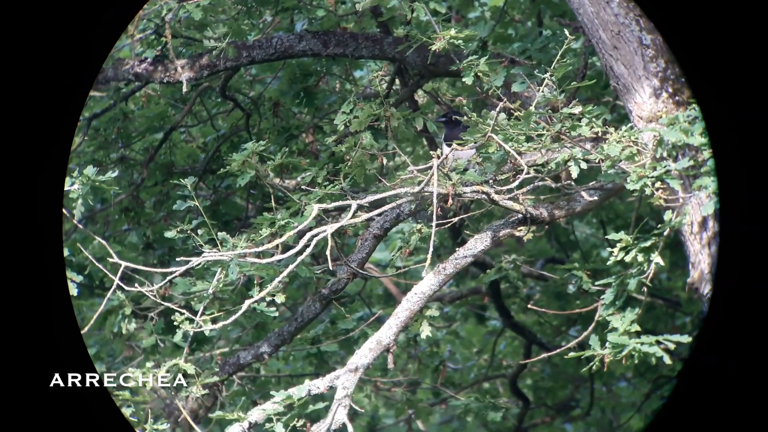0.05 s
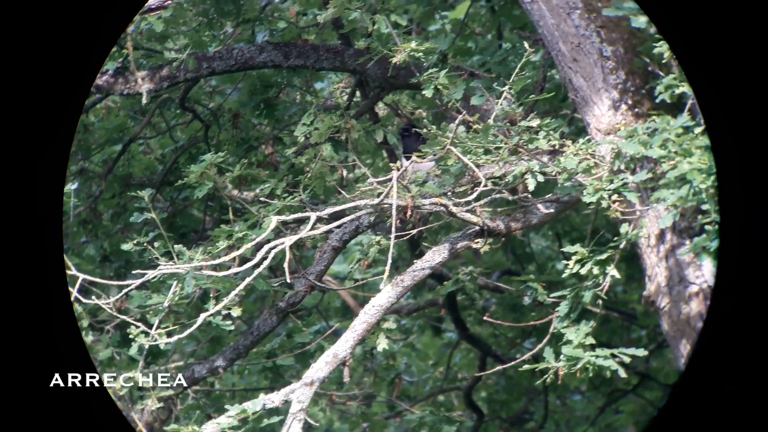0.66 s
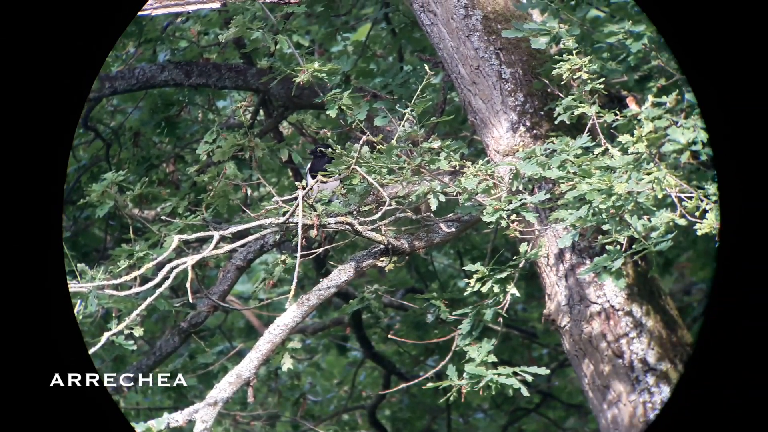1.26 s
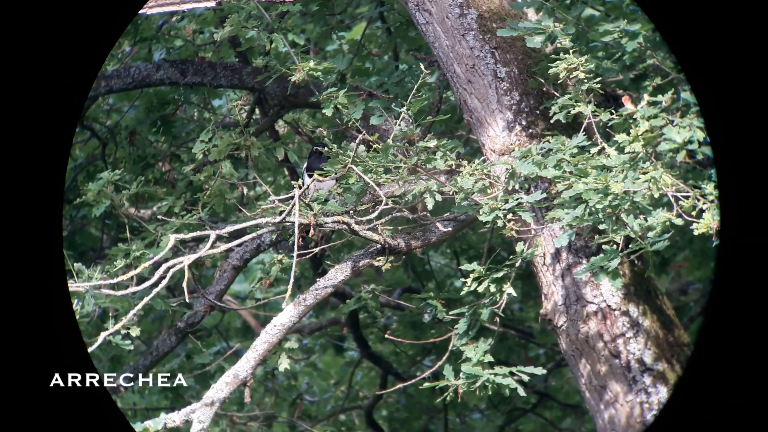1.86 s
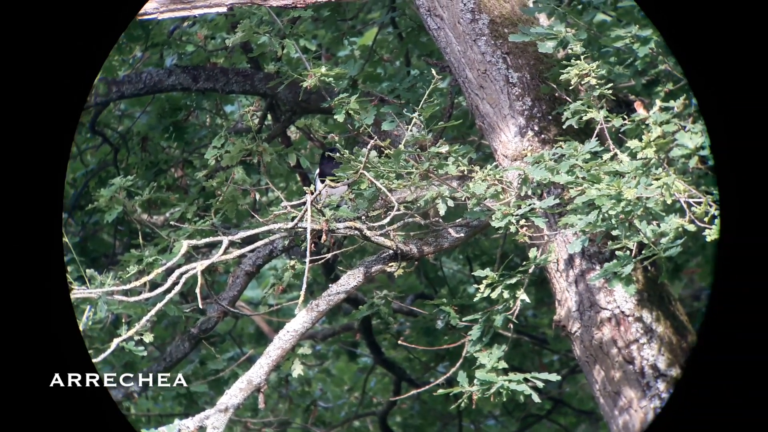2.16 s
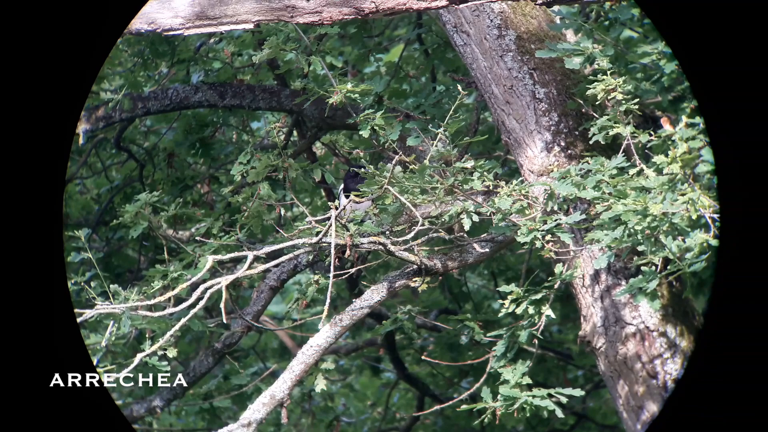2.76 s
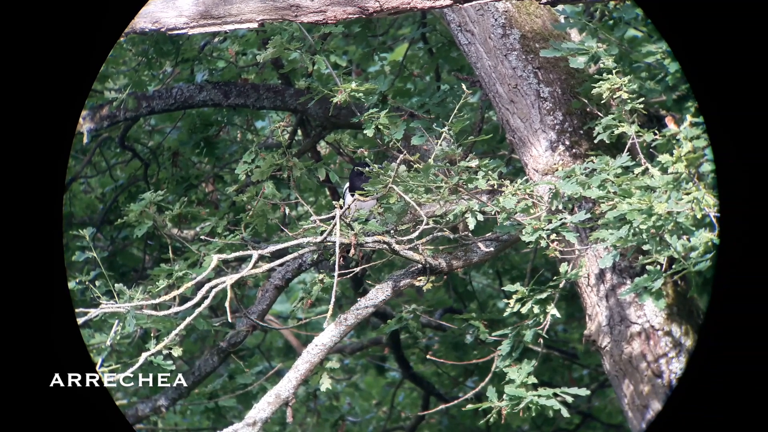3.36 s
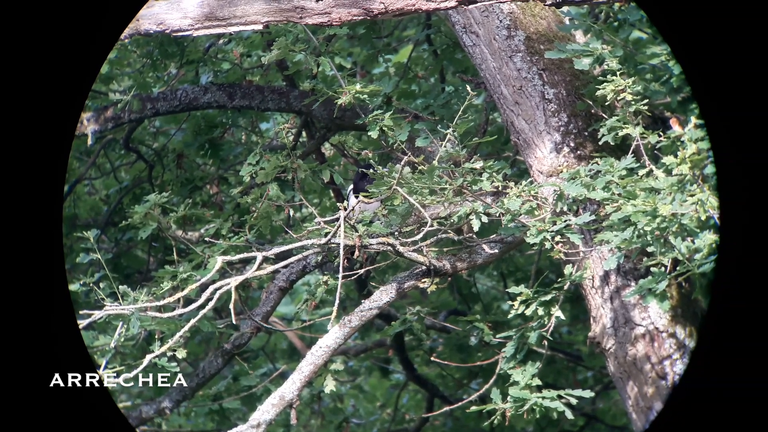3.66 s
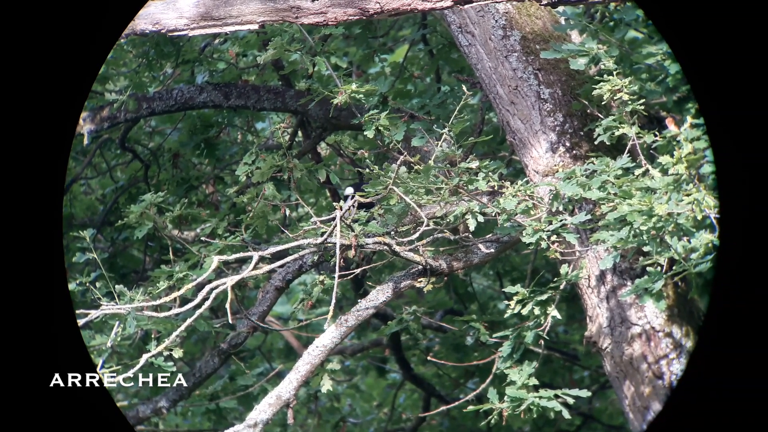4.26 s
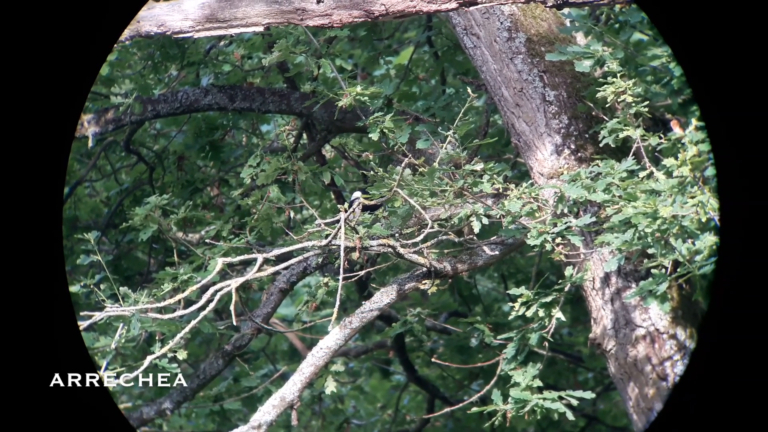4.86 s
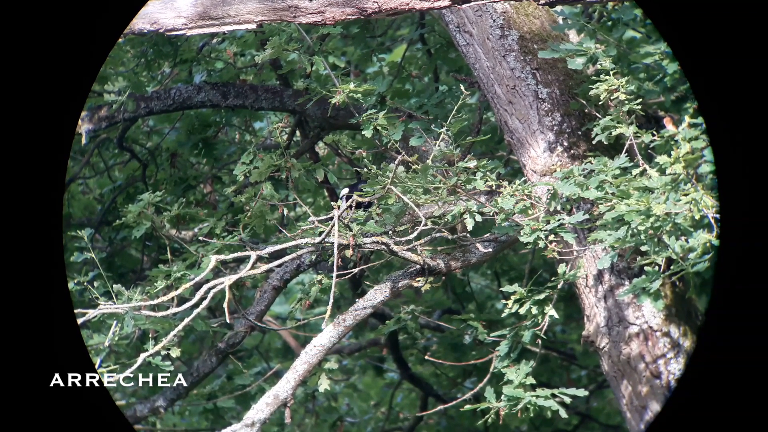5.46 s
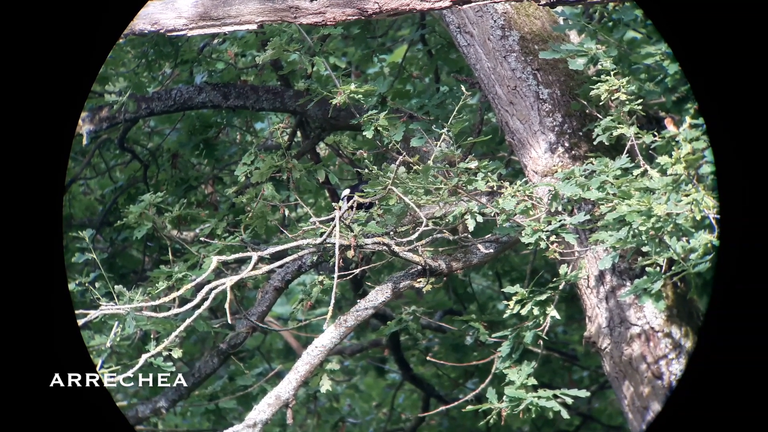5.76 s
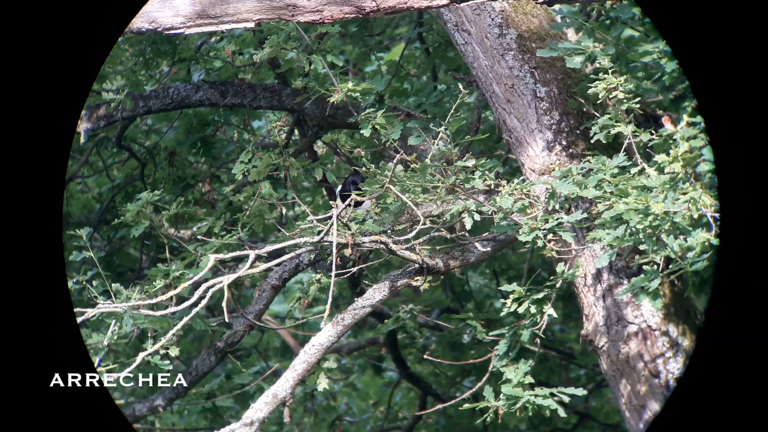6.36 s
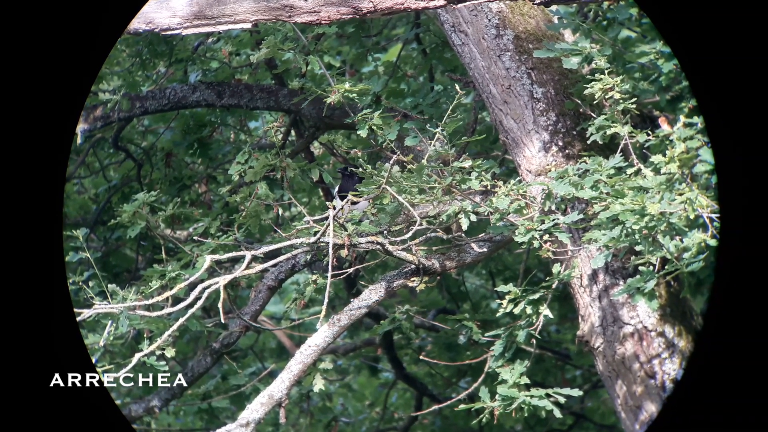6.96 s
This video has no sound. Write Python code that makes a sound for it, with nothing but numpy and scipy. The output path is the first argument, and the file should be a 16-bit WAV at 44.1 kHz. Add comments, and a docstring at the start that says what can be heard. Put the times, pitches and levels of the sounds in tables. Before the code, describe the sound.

Birds yelp, whistle and rasp at irregular intervals among trees, their calls trailing off softly above a faint far-off road rumble.

```python
"""Jackdaws in a summer oak wood

Jackdaws trade yelps that scoop up to a crest and sweep down, thin whistles, dry chaks and a few harsh
screeches. Yelps and whistles are wavering tones coloured by throat and beak; chaks are puffs of noise,
screeches a ragged mix of both. Trunks and leaves scatter each call into a long soft tail. The flock
calls far off, a small songbird pipes high up, twigs tick, leaves hiss and far traffic rumbles below."""
import sys
import numpy as np
from scipy import signal
from scipy.fft import rfft, irfft, next_fast_len
from scipy.io import wavfile
from scipy.ndimage import uniform_filter1d

SR = 44100
rng = np.random.default_rng(int(sys.argv[2]) if len(sys.argv) > 2 else 0)


def generate_wav(sig):
    """Save sig (samples, or channels by samples) to the path in sys.argv[1] as 16-bit PCM at SR."""
    pcm = np.round(np.clip(np.atleast_2d(sig).T, -1, 1) * 32767).astype(np.int16)
    wavfile.write(sys.argv[1], SR, pcm)


N = 313992

# Stereo width of the noises. Each row: frequency in Hz, left-right correlation.
EAR_LIKENESS = [(30, 0.86), (70, 0.97), (150, 0.96), (300, 0.75), (600, 0.28), (1200, 0), (16000, 0)]
# Their lean to one side. Each row: frequency in Hz, right minus left in dB.
EAR_BALANCE = [(40, -3.5), (110, 4), (200, 0.5), (380, 0.5), (700, 1.5), (1400, 0.5), (3000, 0),
               (14000, -0.7)]

# Colours of the noises. Each row: frequency in Hz, relative level in dB.
TRAFFIC_COLOUR = [(20, -33), (35, -24), (55, -5.5), (90, 2.5), (125, -4.5), (200, -8), (280, -10.5),
                  (420, -16), (650, -17), (1000, -24), (1600, -27.5), (3000, -46)]
VEHICLE_COLOUR = [(60, -47), (110, 5.5), (170, 1.5), (260, 9), (340, 1), (450, -9.5), (800, -62)]
HISS_COLOUR = [(500, 2.5), (1200, -4), (2000, 4), (3500, 1.5), (4500, -5), (6000, -13), (9500, -18),
               (12000, -10.5), (15500, -9.5)]
TWIG_COLOUR = [(200, -27), (400, -16), (1300, 14), (2200, -18), (8000, -16), (13000, -6), (16000, -22)]
BRUSH_COLOUR = [(6000, -30), (9500, -6), (12300, 6), (14000, -8), (16000, -23)]
CHAK_COLOUR = [(600, -29), (900, -38), (1150, 5), (1450, -5.5), (2100, -1), (2700, 1.5), (3800, -12.5),
               (5500, -20), (9000, -39)]
RASP_COLOUR = [(1200, -30), (1900, -5.5), (2700, -12), (3300, 4), (4100, 1.5), (5300, -9), (6000, -19),
               (8000, -20), (11000, -40)]

# Ebb and flow of the far traffic. Each row: time in seconds, relative level in dB before compression.
TRAFFIC_SURGE = [(0.0, -58.5), (1.29, -59.5), (2.14, -55), (2.38, -57), (2.7, -56), (3.03, -57),
                 (6.48, -55), (7.12, -58)]
# Partials of a far engine drone. Each row: frequency in Hz, level in dB.
ENGINE_PARTIALS = [(94, -69.5), (183, -69.5), (275, -70), (366, -71.5)]
# Fader rides for the passing vehicle and the leaf hiss. Each row: time in seconds, level in dB.
VEHICLE_LEVEL = [(0, -61.5), (4.4, -66), (5.4, -62), (5.9, -52.5), (6.25, -49), (6.6, -55.5), (7.12, -53.5)]
HISS_LEVEL = [(0, -62.5), (.8, -67.5), (1.5, -62), (3, -62.5), (4.5, -62.5), (5.8, -62.5), (6.15, -64.5),
              (7.12, -64.5)]
# Twig snaps. Each row: start in seconds, level in dB, pitch ratio, treble lift in dB, decay in seconds,
# leaf brush level in dB.
TWIG_SNAPS = [(2.271, -49, 1.05, -13, 0.0026, -85), (3.812, -48, 1, 4, 0.0025, -61)]
# The wood's reverb. Each row: frequency in Hz, echo gain in dB, seconds to die away by 60 dB.
WOOD_REVERB = [(700, -14, .8), (1450, 0.5, 0.98), (2420, 2.5, 1.6), (3640, 4.5, 0.7), (5100, 3, 1.6),
               (7800, 5.5, 1.17), (12100, 7, 0.58)]

# Resonance of throat and beak. Each row: frequency in Hz, relative gain in dB.
THROAT_RESONANCE = [(1000, -5), (1600, -8.5), (2300, 4), (3200, -3), (4200, -1), (5400, -8.5),
                    (6100, -18.5), (8000, -18.5), (12000, -42)]
# The voice is purer at the top of its range. Each row: pitch in Hz, overtone lift in dB.
OVERTONES_BY_PITCH = [(1200, 1), (1600, 1.5), (1900, 4.5), (2250, 4.5), (2700, -6.5)]
# Cues for the hoarse calls. Each row: start in seconds, length in seconds, relative level in dB.
CHAK_CUES = [(0.956, 0.056, -59), (1.193, 0.067, -55.5), (1.361, 0.055, -61.5), (1.463, 0.033, -59),
             (1.566, 0.03, -55.5), (2.256, 0.023, -62), (2.314, 0.036, -59), (4.527, 0.085, -51),
             (6.262, 0.095, -66.5), (6.79, 0.063, -58.5)]
SCREECH_CUES = [(4.609, 0.17, -56.5), (4.862, .18, -54.5), (5.159, 0.15, -51.5), (5.478, 0.19, -52.5),
                (5.762, 0.19, -64.5)]
# Course of a screech. Each row: share of its length, pitch in Hz, tone gain in dB, rasp gain in dB.
SCREECH_COURSE = [(0, 1896, -14, -20), (.2, 2500, -4.5, -9.5), (.35, 2747, -7, -4.5), (.55, 2706, -12, -3),
                  (.8, 2500, -10, -6.5), (1, 2180, -9, -12)]
# Whistles; the highest are the songbird's. Each row: start and length in seconds, opening and held pitch
# in Hz, settling time in seconds, level in dB, fade over the note in dB, bearing from -1 right to
# 1 left, echo send in dB, roughness from 0 to 1.
WHISTLE_CUES = [ (0.034, 0.0605, 3023, 2783, 0.051, -52, 5.5, -0.094, -0.5, 0.75),
                (0.271, 0.28, 8280, 7370, 0.07, -75, 14, 0.23, -0.5, 0.43),
                (0.504, 0.17, 5900, 5020, .011, -68, 9, 0.13, -5, 0.4),
                (.62, 0.16, 2670, 2515, 0.072, -71, 9, -0.015, -6, 0.61),
                (0.708, 0.12, 5900, 5010, 0.014, -64.5, 3, .18, -8, 0.42),
                (0.906, .155, 7100, 6576, 0.013, -65.5, 8, -0.12, -6, 0.08),
                (1.033, .035, 2770, 2490, 0.019, -50, 12, .37, -13, .26),
                (1.318, .18, 6060, 5360, 0.0067, -68, 4, 0.21, -6, 0.38),
                (3.693, 0.11, 3700, 3140, 0.021, -50.5, -4.5, .03, -6.5, 0.25),
                (4.047, 0.029, 3600, 3120, 0.02, -48.5, 4, -0.2, -5, 0),
                (4.58, 0.13, 4130, 4050, 0.017, -55.5, 4.5, -0.077, -0.5, 0.66),
                (4.619, .065, 2810, 2370, 0.039, -46.5, 17, 0.47, -3, 0.33),
                (4.63, 0.16, 5600, 4920, .03, -62, 3, 0.15, -3, 0.9),
                (5.505, .05, 2400, 2745, 0.031, -50.5, -3, -0.51, -14, 0.66),
                (5.738, .11, 4200, 4240, .03, -60, 13, .16, -7, 0.77),
                (6.206, 0.14, 2112, 1956, 0.081, -74.5, 1, 0.34, 7.5, 1),
                (6.29, .05, 2830, 2696, 0.046, -69.5, 1.5, 0.29, 1, 1),
                (6.461, .065, 3160, 2954, 0.01, -62, 11, -.1, -20, .22),
                (6.652, 0.11, 3700, 3560, 0.031, -70, 7, .27, 4, 0.52),
                (6.768, 0.026, 3210, 2950, 0.015, -52, 13, -0.13, -1, 0.7),
                (7.089, 0.033, 3190, 2990, 0.025, -66.5, -2, 0, -7, 0.6)]
# Yelps. Each row: crest time, rise and fall in seconds, crest and end pitch in Hz, bend of the fall
# (1 is straight, more hangs on), crest and sweep level in dB, overtone lift in dB, roughness from 0 to 1,
# bearing from -1 right to 1 left, echo send in dB.
YELP_CUES = [ (.055, 0.05, 0.094, 2352, 1560, 1.65, -58.5, -49.5, 2.5, .45, 0.21, -0.5),
             (1.02, .045, .075, 2320, 1626, 1.4, -56, -50, 1.5, .4, 0.58, 1),
             (1.565, 0.0089, .109, 2764, 1650, 1.86, -58, -52.5, 7, 0.16, -0.91, -0.5),
             (1.715, 0.055, 0.074, 2138, 1374, 1.2, -48, -49, 4, .45, .26, -1.5),
             (1.85, 0, 0.13, 2703, 1503, 1.3, -63, -53.5, 0.5, 0.42, -0.7, 0),
             (2.085, 0.00096, 0.099, 2587, 1554, 2.65, -58.5, -52.5, 3.5, 0.35, 0.14, -2.5),
             (2.19, 0.00041, .105, 2607, 1540, 1.15, -62, -53, .5, 0.39, -0.73, 1),
             (2.39, 0.0031, 0.04, 1530, 1076, 2.5, -62, -55, -2, 0.23, -.7, -7),
             (2.516, .022, 0.012, 1693, 1620, 1, -45, -40, 3, 0.2, .09, -6),
             (2.543, 0.033, 0.087, 2300, 1308, 1.18, -44, -44, 4, 0.3, 0.098, -8),
             (2.7, 0.038, 0.078, 1862, 1100, 1.84, -56, -62, -0.5, 0.29, -0.56, -6.5),
             (2.915, 0.075, 0.084, 2723, 1435, 2, -60, -47, 4.5, 0.44, 0.067, -5.5),
             (3.178, 0, .088, 2504, 1810, 1.9, -62.5, -51, 5, 0.33, 0.12, -8),
             (3.285, 0.041, 0.09, 2022, 1404, 0.6, -47.5, -47.5, 2.5, 0.49, -0.15, -5.5),
             (3.69, 0.033, 0.0033, 2200, 2200, 1, -62, -70, 0, .4, -0.15, -18),
             (3.8, 0.0027, 0.093, 2639, 1460, 2.23, -53.5, -47.5, 4, 0.36, 0.099, -6),
             (4.067, 0.001, 0.11, 2690, 1373, 2.8, -58, -48, 2, 0.45, 0.053, -4.5),
             (4.259, 0.042, 0.013, 1614, 1630, 1.1, -69, -50, -7, 0.29, -0.39, -8),
             (4.277, .008, .09, 2118, 1456, 1, -56, -56.5, -1.5, 0.28, -0.32, 1.5),
             (4.72, 0.041, 0.07, 1855, 1220, 1.4, -58, -66, -4, 0.57, -0.32, -3),
             (4.96, 0, 0.08, 1854, 1245, 2.3, -55, -58.5, 1, 0.57, -0.86, -3),
             (5.155, 0.055, 0.015, 1946, 1930, 1, -63, -68, -7, 0.52, -0.6, 7),
             (5.25, 0.0054, 0.071, 1745, 1200, 2.17, -57, -54, 4, 0.57, -0.92, -1.5),
             (5.57, 0.004, 0.067, 1932, 1265, 2.1, -62, -63, -8, 0.42, -.87, 4),
             (6.57, 0.003, 0.034, 2190, 1790, 1.15, -71, -74, 4, 0.33, -.8, -12),
             (6.82, 0.0061, .055, 2110, 1770, 1, -67, -68, -5, .3, -0.54, 3)]
# A typical distant yelp: one such row without the crest time. Its negative rise means no scoop.
DISTANT_YELP = (-0.4, 0.03, 2203, 1500, 1.5, -80, -76.5, 0, 0.4, 0.3, 10)

CUTOFF_HZ = 15750
NOTE_EDGE_S = .009


def from_db(db):
    """Decibels to gain."""
    return 10 ** (np.asarray(db) / 20)


def unit_rms(x):
    """Scale to unit power."""
    return x / np.sqrt(np.mean(x ** 2) + 1e-20)


def fader(rows):
    """Gain at every sample from rows of seconds and dB."""
    return from_db(np.interp(np.arange(N) / SR, *np.transpose(rows)))


def at_hz(table, hz, column=1):
    """Read a column of a table on a log-frequency axis."""
    table = np.array(table)
    return np.interp(np.log(np.maximum(hz, 1)), np.log(table[:, 0]), table[:, column])


def drift(rate_hz, size):
    """Smooth random wander of spread 1."""
    pole = np.exp(-2 * np.pi * rate_hz / SR)
    run_in = int(SR / rate_hz)
    white = rng.standard_normal(size + run_in)
    return signal.lfilter([2 * (1 - pole) ** 1.5], [1, -2 * pole, pole * pole], white)[run_in:]


def noise(colour, size):
    """Coloured stereo noise of unit power, centred in the bass and wide above."""
    padded = next_fast_len(size)
    hz = np.fft.rfftfreq(padded, 1 / SR)
    mid, side = rfft(rng.standard_normal((2, padded)))
    alike, ears = np.clip(at_hz(EAR_LIKENESS, hz), -1, 1), np.array([[-1], [1]])
    pair = np.sqrt(1 + alike) * mid + ears * np.sqrt(1 - alike) * side
    gain = from_db(at_hz(colour, hz) + ears * at_hz(EAR_BALANCE, hz) / 2)
    return unit_rms(irfft(pair * gain, padded)[:, :size])


def soft_gate(size, edge_s):
    """A gate with rounded ends."""
    steps = np.arange(size)
    return np.sin(np.pi / 2 * np.clip(np.minimum(steps, steps[::-1]) / (edge_s * SR), 0, 1))


def phase_of(hz):
    """Running phase of a moving pitch, in radians."""
    return 2 * np.pi * np.cumsum(hz) / SR


def add(track, start_s, sound):
    """Mix a sound into a track."""
    at = max(int(start_s * SR), 0)
    track[:, at:at + sound.shape[-1]] += sound[:, :max(N - at, 0)]


def far_traffic(rumble_db=-54.0, surge_depth=0.5, wander_hz=2.54):
    """A bed of road rumble with a wavering engine drone; one distant vehicle swells past."""
    surge = unit_rms(fader(TRAFFIC_SURGE) ** surge_depth)
    rumble = from_db(rumble_db) * surge * noise(TRAFFIC_COLOUR, N)
    drone = sum(from_db(db) * np.sqrt(2) * np.sin(phase_of(hz + wander_hz * drift(4.14, N)))
                for hz, db in ENGINE_PARTIALS)
    vehicle = fader(VEHICLE_LEVEL) * noise(VEHICLE_COLOUR, N)
    return rumble + drone + vehicle


def leaves():
    """A faint, airy hiss from the leaves."""
    return fader(HISS_LEVEL) * noise(HISS_COLOUR, N)


def twigs(brush_s=0.035, treble_hz=5000):
    """Twigs tick nearby, and a leaf brushes after each."""
    out, size = np.zeros((2, N)), int(brush_s * SR)
    for start, db, ratio, treble_db, decay_s, brush_db in TWIG_SNAPS:
        colour = [(hz * ratio, band_db + treble_db * (hz > treble_hz)) for hz, band_db in TWIG_COLOUR]
        tick = from_db(db) * noise(colour, size) * np.exp(-np.arange(size) / (decay_s * SR))
        brush = from_db(brush_db) * noise(BRUSH_COLOUR, size) * soft_gate(size, brush_s / 3)
        add(out, start, tick + brush)
    return out


def woodland_echo(send, tail_s=1.3, build_s=0.0097, early_db=-2.0, early_s=0.0087):
    """Near branches answer at once; far trunks leave a long tail that dies soonest at the very top."""
    t = np.arange(int(tail_s * SR)) / SR
    edges_hz = np.geomspace(500, 15000, 11)
    onset = (1 - np.exp(-t / build_s)) * (1 + from_db(early_db) * np.exp(-t / early_s))
    white = rng.standard_normal((2, 2, len(t)))
    response = np.zeros((2, len(t)))
    for k, (low, high) in enumerate(zip(edges_hz, edges_hz[1:])):
        hz = np.sqrt(low * high)
        envelope = onset * from_db(-60 * t / at_hz(WOOD_REVERB, hz, column=2))
        envelope /= np.sqrt(np.sum(envelope ** 2))
        band = signal.sosfilt(signal.butter(2, [low, high], "band", fs=SR, output="sos"), white[k % 2])
        response += band * envelope * from_db(at_hz(WOOD_REVERB, hz))
    return signal.fftconvolve(send, response, axes=1)[:, :N]


def branch_scatter(calls, scatter_db=-5.0, longest_s=.02, count=14):
    """Twigs along the path add short detours, other ones for each ear, so a gliding tone ripples."""
    out = calls.copy()
    gain = from_db(scatter_db) / np.sqrt(count)
    for ear in range(2):
        for delay_s, sign in zip(rng.uniform(.001, longest_s, count), rng.choice([-1, 1], count)):
            lag = int(delay_s * SR)
            out[ear, lag:] += sign * gain * calls[ear, :-lag]
    return out


def far_flock(count=16, pitch_spread=.15, level_spread_db=10):
    """Yelp cues for distant birds, each at its own moment, pitch and strength."""
    rise, fall, crest_hz, end_hz, bend, crest_db, sweep_db, *voice = DISTANT_YELP
    cues = []
    for k, (when, pitch, strength) in enumerate(rng.uniform(-1, 1, (count, 3))):
        ratio, db = 1 + pitch_spread * pitch, level_spread_db * strength
        crest_s = (k + .5 + when / 2) * N / SR / count
        cues.append((crest_s, rise, fall, crest_hz * ratio, end_hz * ratio, bend,
                     crest_db + db, sweep_db + db, *voice))
    return cues


def chaks(grain_db=0.5):
    """Short, hoarse, toneless calls: puffs of noise that swell and fade."""
    out = np.zeros((2, N))
    for start, length, db in CHAK_CUES:
        size = int(length * SR)
        swell = np.sin(np.linspace(0, np.pi, size))
        grain = from_db(-grain_db * np.tanh(drift(220, size)))
        add(out, start, from_db(db) * swell * grain * noise(CHAK_COLOUR, size))
    return out


def screeches(jitter=0.0485, grain_db=2.0, trill_hz=55, trill_depth=0.32):
    """The syrinx runs chaotic: a ragged, trilling tone rises and breaks up into a broad rasp."""
    out = np.zeros((2, N))
    share, *course = np.transpose(SCREECH_COURSE)
    for start, length, db in SCREECH_CUES:
        size = int(length * SR)
        hz, tone_db, rasp_db = [np.interp(np.linspace(0, 1, size), share, column) for column in course]
        phase = phase_of(hz * (1 + jitter * drift(444, size)))
        tone = from_db(tone_db) * np.array([np.sin(phase), np.cos(phase)])
        rasp = from_db(rasp_db) * noise(RASP_COLOUR, size)
        trill = 1 + trill_depth * np.sin(phase_of(trill_hz * (1 + 0.22 * drift(27, size))))
        throb = unit_rms(trill * from_db(grain_db * drift(119, size)))
        add(out, start, (tone + rasp) * throb * from_db(db) * soft_gate(size, NOTE_EDGE_S))
    return out


def syrinx(hz, level_db, bearing, rough, overtone_db, waver=0.0123, jitter=.02, flutter_db=7.0,
           rasp_rad=0.35, effort=0.32, rolloff_db=-3.0, ear_lag_s=.0003, shadow_db=0.5):
    """One note of the voice box: a wavering tone whose harmonics slide through the throat resonance."""
    size = len(hz)
    glide = uniform_filter1d(hz, size=300, mode="nearest") * (1 + rough * waver * drift(45, size))
    pitch = glide * (1 + rough * jitter * drift(280, size))
    harmonic = np.arange(1, 6)[:, None]
    # Overtones open up as the bird pushes harder.
    bright_db = overtone_db + at_hz(OVERTONES_BY_PITCH, glide) + effort * (level_db - level_db.mean())
    source_db = bright_db * (harmonic > 1) + rolloff_db * np.maximum(harmonic - 2, 0)
    weights = from_db(source_db + at_hz(THROAT_RESONANCE, harmonic * pitch))
    weights *= (harmonic * pitch < CUTOFF_HZ) / np.sqrt(np.sum(weights ** 2, axis=0))
    weights *= from_db(rough * flutter_db * drift(108, size))
    phase = phase_of(pitch) + rough * rasp_rad * drift(967, size)
    # The nearer ear gets the note a touch earlier and louder.
    lead = np.pi * glide * bearing * ear_lag_s
    ears = []
    for side in (1, -1):
        tone = np.sum(weights * np.cos(harmonic * (phase + side * lead)), axis=0)
        ears.append(from_db(side * bearing * shadow_db) * tone)
    return np.sqrt(2) * np.array(ears) * from_db(level_db) * soft_gate(size, NOTE_EDGE_S)


def whistles(overtone_db=-5.5, onset_db=-5.5):
    """Thin notes that slide onto a held pitch, swelling as they settle. Gives direct and echo send."""
    direct, send = np.zeros((2, 2, N))
    for start, length, from_hz, held_hz, settle_s, db, fade_db, bearing, send_db, rough in WHISTLE_CUES:
        t = np.arange(0, length, 1 / SR)
        unsettled = np.exp(-t / settle_s)
        hz = held_hz + (from_hz - held_hz) * unsettled
        level_db = db + onset_db * unsettled - fade_db * t / length
        note = syrinx(hz, level_db, bearing, rough, overtone_db)
        add(direct, start, note)
        add(send, start, note * from_db(send_db))
    return direct, send


def yelps(cues, scoop_depth=.38, scoop_bend=2.4, onset_db=-2, release_db=-2, push_share=0.85):
    """Calls that scoop up and sweep down, most pushing late in the fall. Gives direct and echo send."""
    direct, send = np.zeros((2, 2, N))
    for (crest_s, rise, fall, crest_hz, end_hz, bend, crest_db, sweep_db,
         overtone_db, rough, bearing, send_db) in cues:
        t = np.arange(-max(rise, 0), fall, 1 / SR)
        scoop = np.maximum(-t, 0) / max(rise, 1 / SR)   # 1 at the start, 0 from the crest on
        sweep = np.maximum(t, 0) / fall   # 0 up to the crest, 1 at the end
        hz = crest_hz * (1 - scoop_depth * scoop ** scoop_bend) + (end_hz - crest_hz) * sweep ** bend
        fall_db = np.interp(sweep, [0, push_share, 1], [crest_db, sweep_db, sweep_db + release_db])
        note = syrinx(hz, onset_db * scoop + fall_db, bearing, rough, overtone_db)
        add(direct, crest_s + t[0], note)
        add(send, crest_s + t[0], note * from_db(send_db))
    return direct, send


def scene():
    """The birds and their woodland echo over twigs, traffic and leaves."""
    yelp, yelp_send = yelps(list(YELP_CUES) + far_flock())
    whistle, whistle_send = whistles()
    screech, chak = screeches(), chaks()
    echo = woodland_echo(yelp_send + whistle_send + from_db(3.5) * screech + from_db(0.5) * chak)
    birds = branch_scatter(yelp + whistle) + from_db(2.5) * (screech + chak)
    return birds + echo + twigs() + far_traffic() + leaves()


def record(dry):
    """A steep low-pass takes the very top off the mix."""
    return signal.sosfilt(signal.ellip(12, .1, 70, CUTOFF_HZ, fs=SR, output="sos"), dry)


dry = scene()
out = record(dry)
generate_wav(out)
```